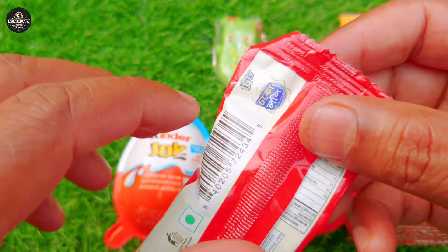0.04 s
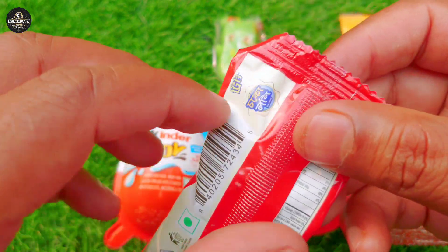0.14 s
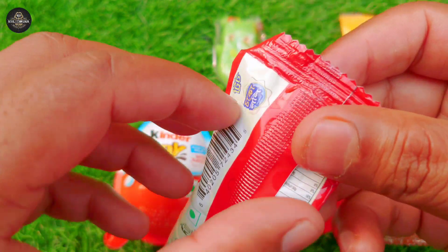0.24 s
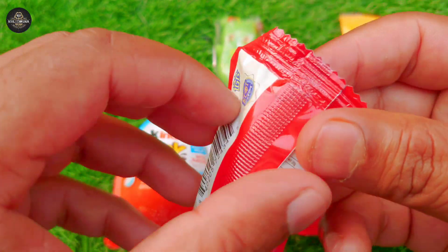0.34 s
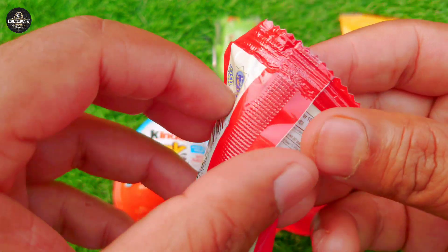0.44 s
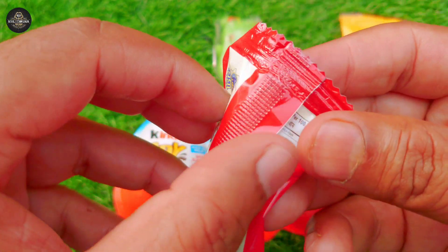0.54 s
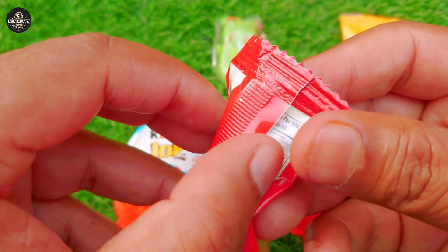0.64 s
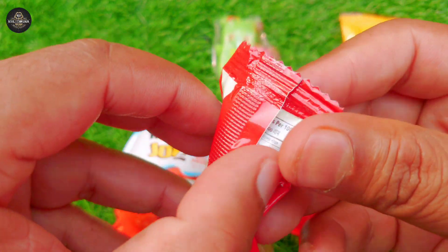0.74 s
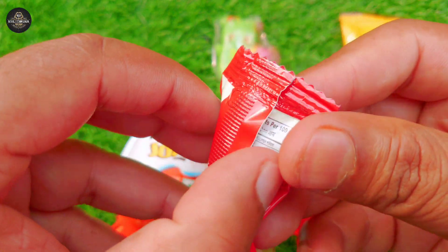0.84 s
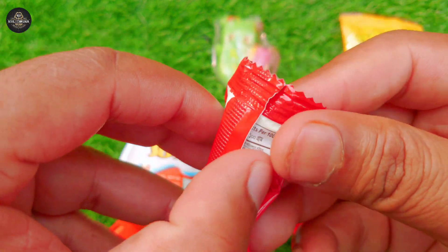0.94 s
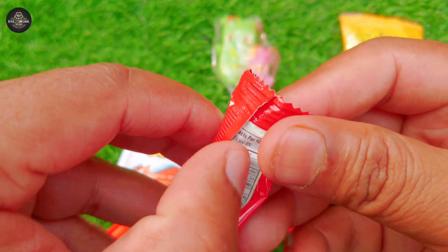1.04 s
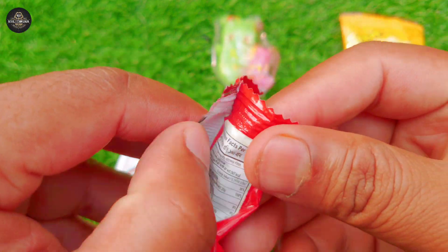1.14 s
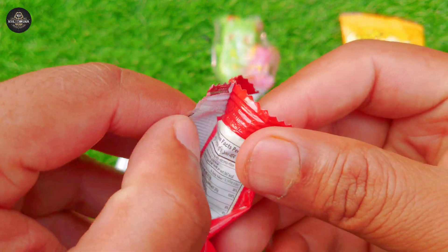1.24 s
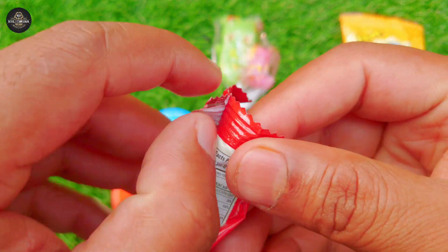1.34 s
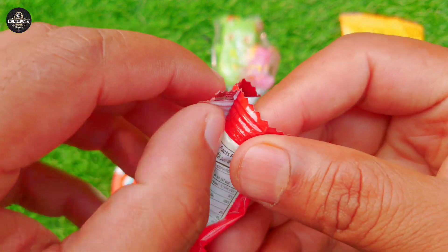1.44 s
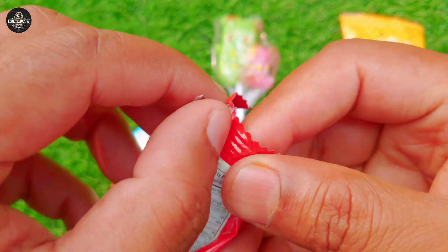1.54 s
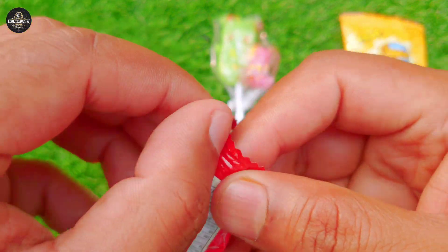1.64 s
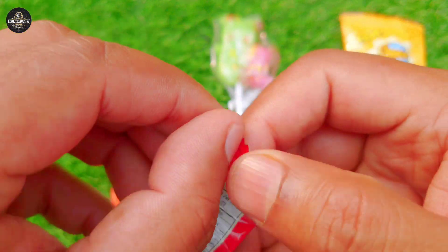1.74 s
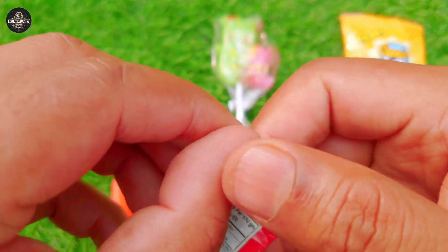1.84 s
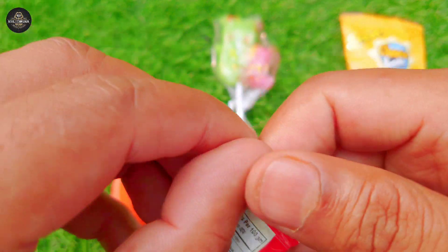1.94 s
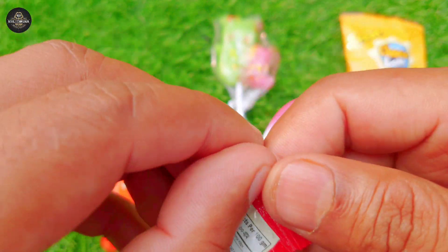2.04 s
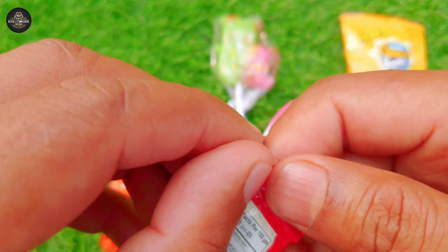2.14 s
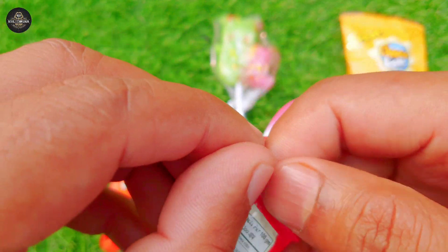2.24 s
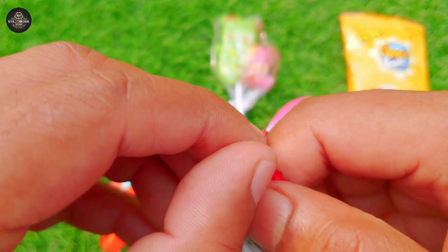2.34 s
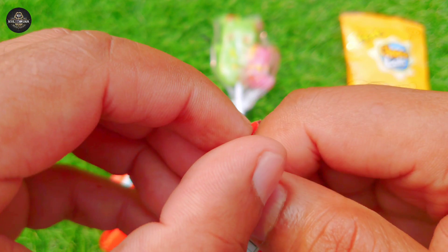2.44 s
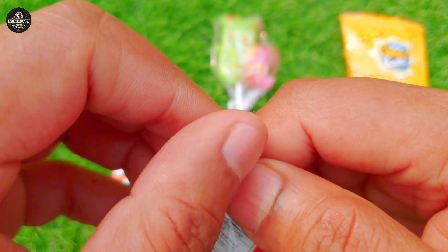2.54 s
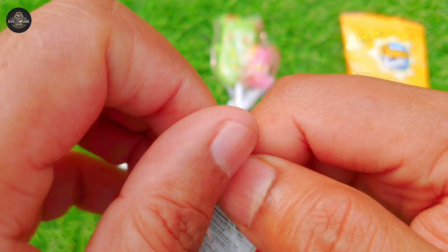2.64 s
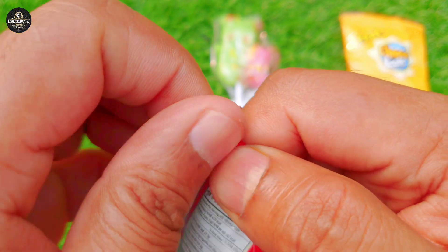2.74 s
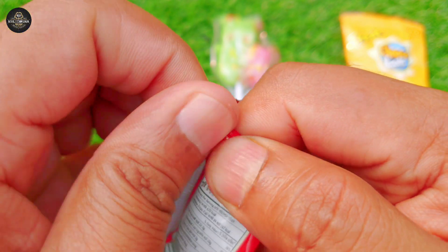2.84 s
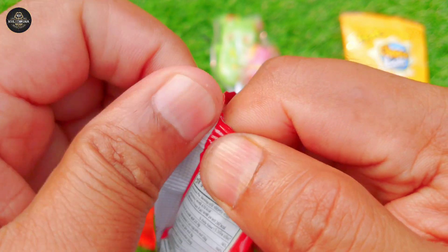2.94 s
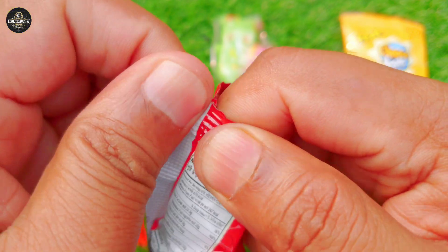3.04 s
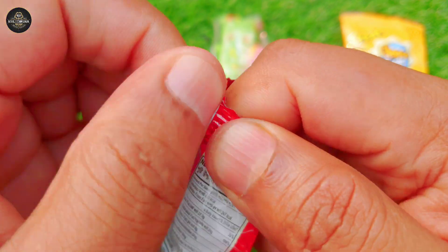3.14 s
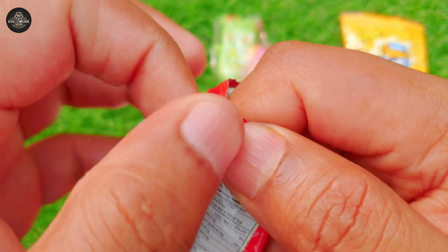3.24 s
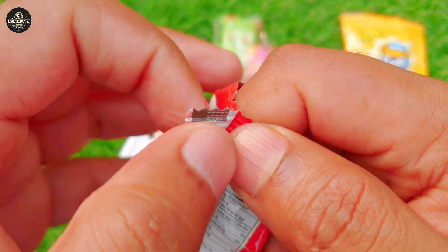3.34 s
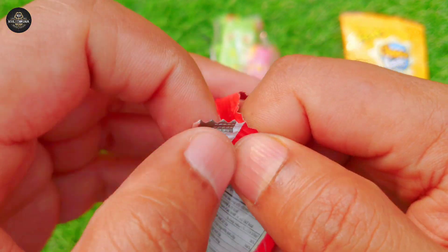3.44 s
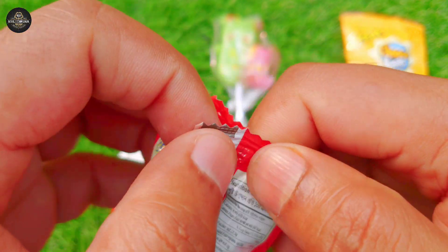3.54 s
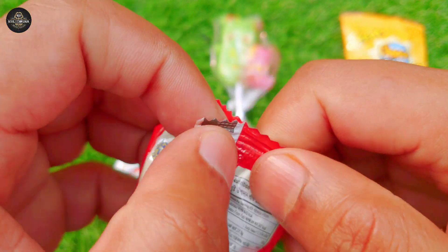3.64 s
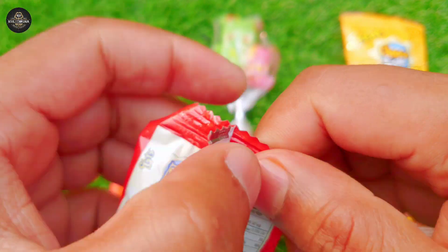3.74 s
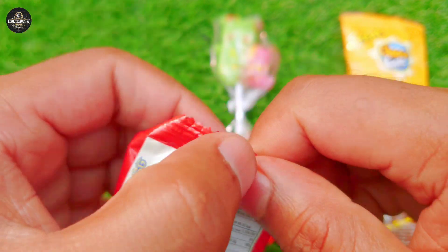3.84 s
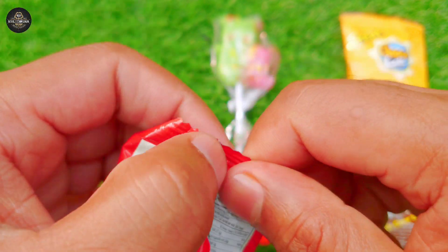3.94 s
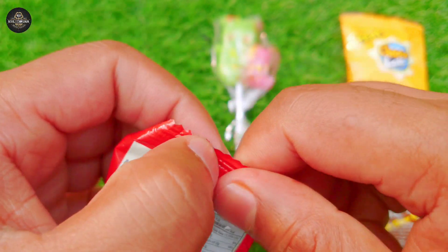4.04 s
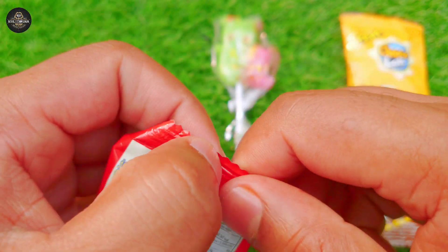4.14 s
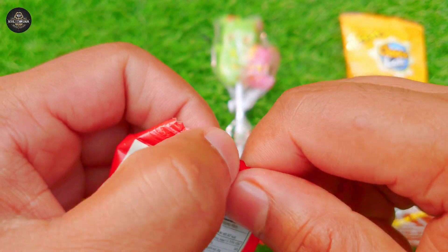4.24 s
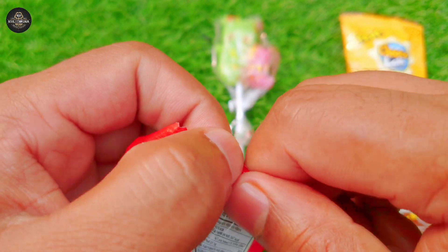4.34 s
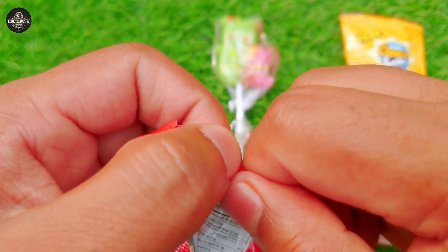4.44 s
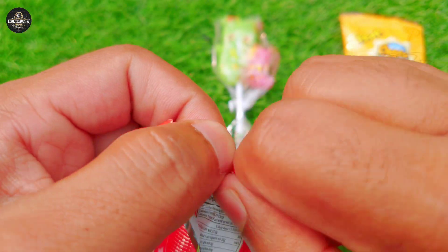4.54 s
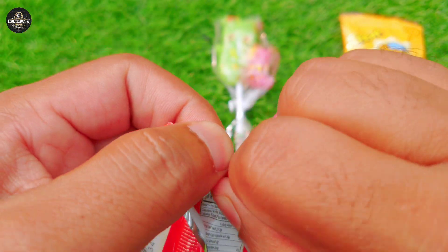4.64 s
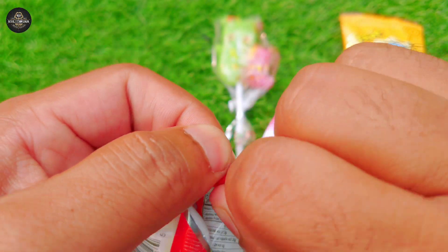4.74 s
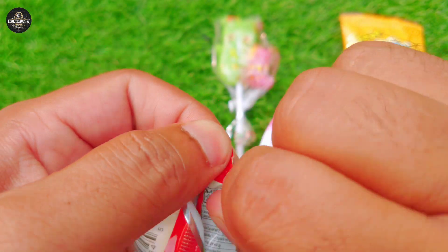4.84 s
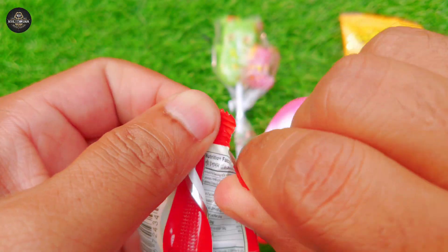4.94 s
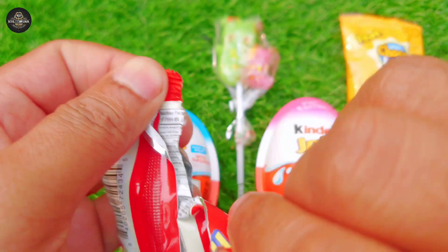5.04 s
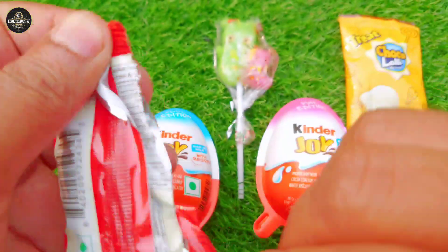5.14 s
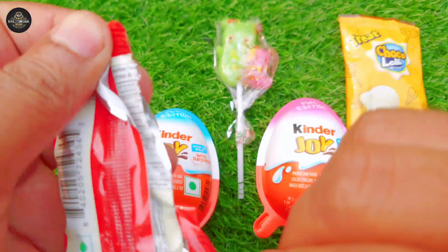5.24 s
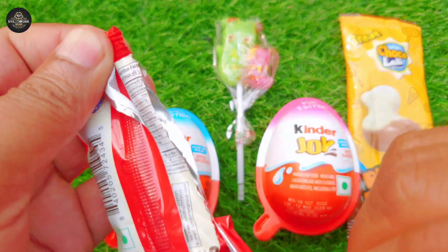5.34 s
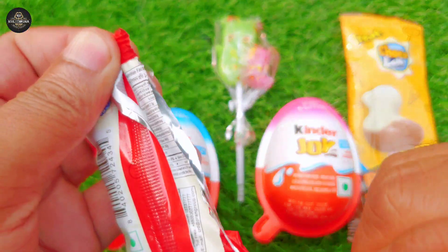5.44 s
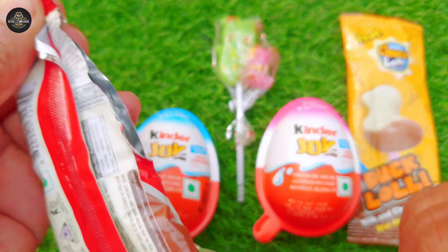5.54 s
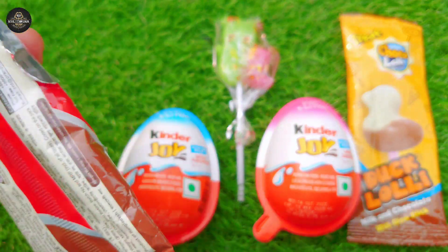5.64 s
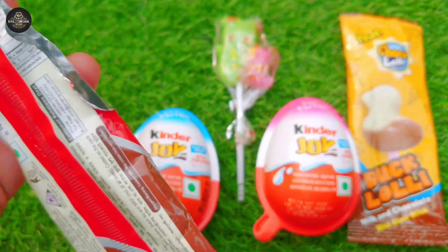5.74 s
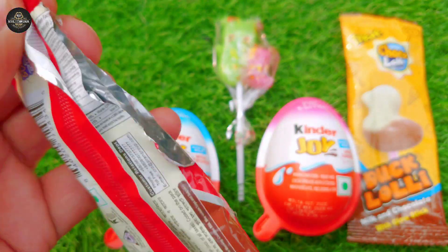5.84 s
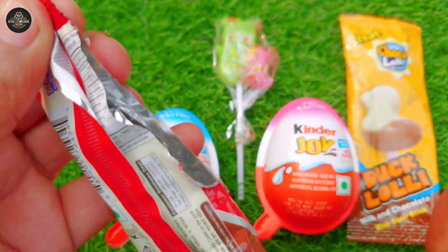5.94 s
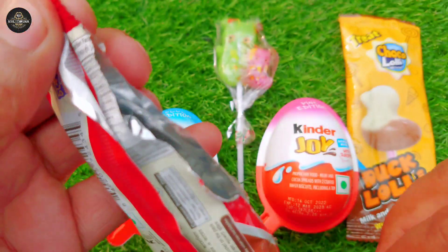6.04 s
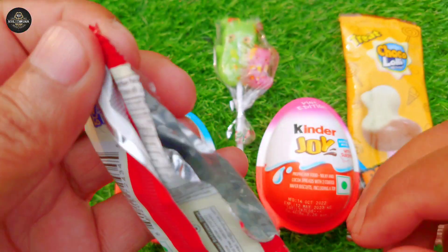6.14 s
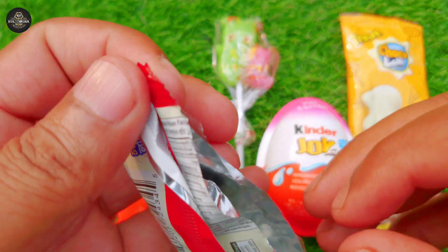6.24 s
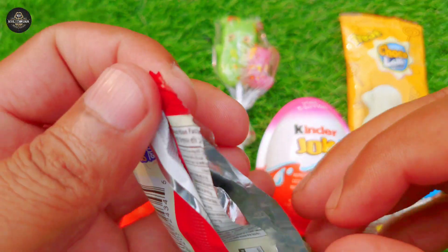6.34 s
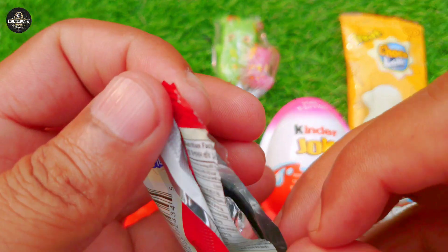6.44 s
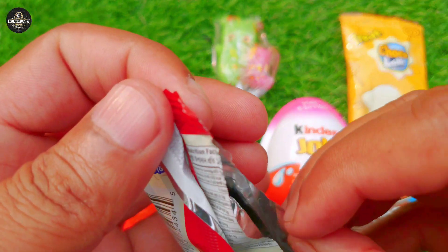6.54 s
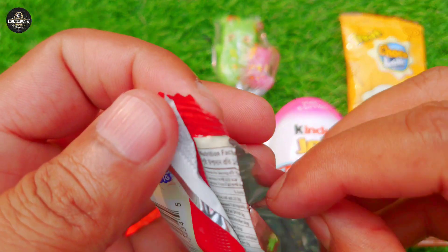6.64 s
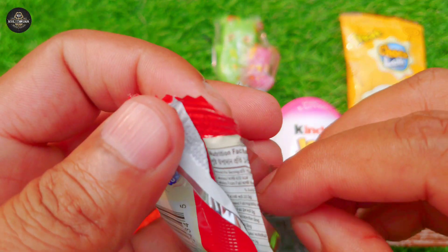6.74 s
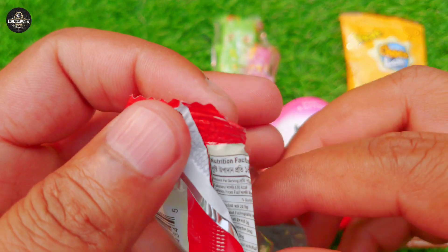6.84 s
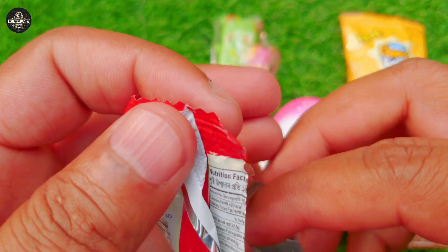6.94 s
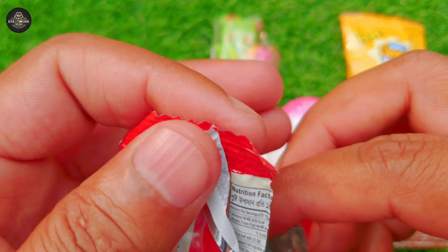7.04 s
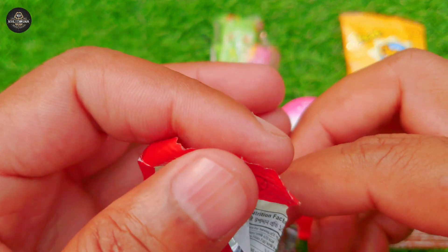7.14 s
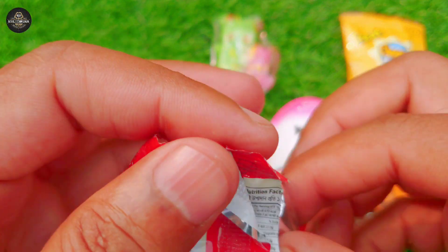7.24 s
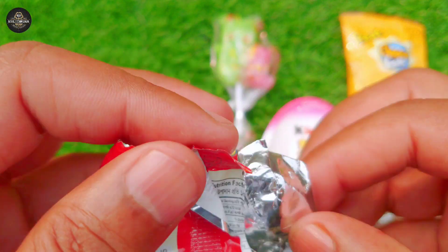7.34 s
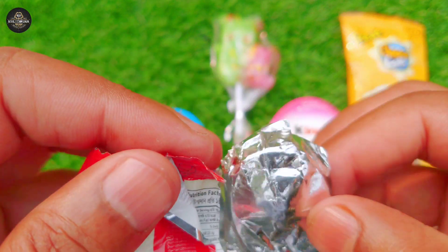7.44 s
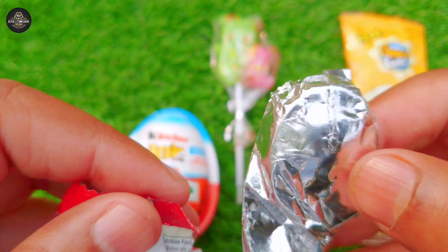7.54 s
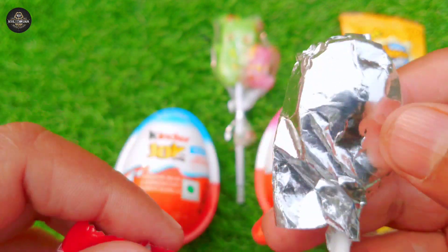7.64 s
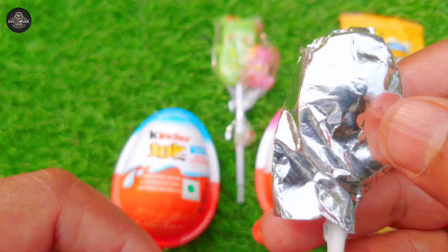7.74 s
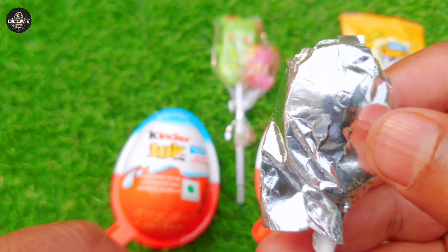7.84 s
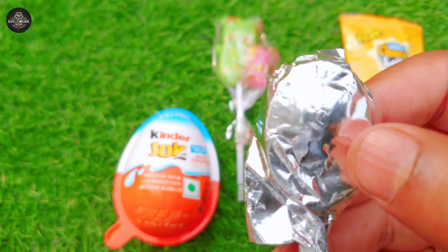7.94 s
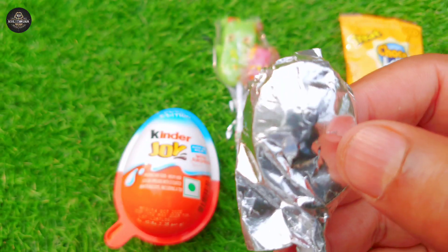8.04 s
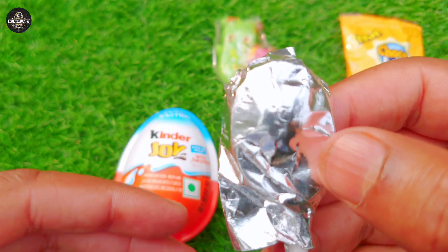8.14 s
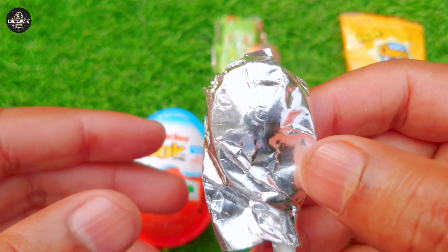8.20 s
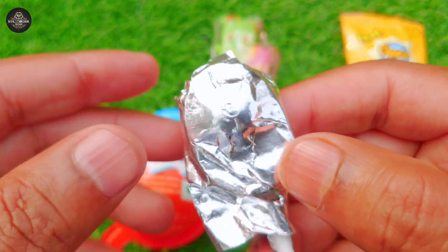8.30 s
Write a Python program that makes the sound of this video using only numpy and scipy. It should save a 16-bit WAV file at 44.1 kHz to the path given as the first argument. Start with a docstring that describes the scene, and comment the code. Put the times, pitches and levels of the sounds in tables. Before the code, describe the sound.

Fingers crinkle and peel a stiff film packet in sharp snaps and fine crackle, while a faint hum and distant hoarse bird sit behind.

```python
"""Fingers pinch, tear and peel open a plastic sweet wrapper close to the microphone, then draw out a foil-wrapped lolly.
Noise pushes ring film resonances: creases buckle in single snaps over a bed of fine crackle.
Hands knock softly as damped sines, film slides as swelling top-end hiss, and the seam squeaks in fast runs of slips.
Behind lie a sinking motor hum, drone, air, a thin high tone, a far bird of throat-filtered pulses and a sagging tone.
The recorder cuts a row of notches into the sound."""
import sys
import numpy as np
from scipy import signal
from scipy.fft import rfft, irfft
from scipy.io import wavfile

SR = 44100
rng = np.random.default_rng(int(sys.argv[2]) if len(sys.argv) > 2 else 0)


def wrap_up_sound(samples):
    """Save the sound to the file named by the first command line argument, as 16-bit audio."""
    columns = np.atleast_2d(samples).T
    # keep every value between -1 and 1, then stretch to whole-number steps
    tamed = np.clip(columns, -1, 1)
    steps = np.round(tamed * 32767).astype(np.int16)
    wavfile.write(sys.argv[1], SR, steps)


N = 369116
TIME = np.arange(N) / SR

# loud creases buckling: start_s, then levels before the mix lift of the held packet's thump_db,
# the film panel's crack_db and the crease's tick_db
LOUD_SNAPS = [(0.037,-50,-47.5,-50),(0.207,-43.5,-41,-47),(0.3531,-48,-43,-47),(0.3613,-41,-34,-40),(0.3835,-75,-44,-54),(0.407,-53.5,-49,-58),(0.4487,-56,-74,-84),
              (0.5191,-47,-48,-49.5),(0.5453,-44.5,-44,-48),(0.5896,-45,-51,-51),(0.6111,-41,-35,-36),(0.625,-52,-49,-47.5),(0.7211,-77,-57.5,-79),(0.7683,-39,-46,-48.5),(0.8112,-55,-47.5,-39),(0.8166,-46,-32.5,-36),(0.8665,-63,-52.5,-42.5),
              (1.0102,-55,-52.5,-55),(1.0701,-47,-40.5,-43),(1.1294,-41,-43,-57),(1.213,-54,-45,-47),(1.2184,-55,-42,-43),(1.297,-46.5,-43,-39.5),(1.3204,-71,-48,-55),(1.3411,-42.5,-36.5,-39.5),(1.395,-44.5,-52,-40.5),(1.3993,-52,-41,-40.5),(1.4163,-68,-46,-40.5),
              (1.577,-56,-44,-36),(1.5895,-53,-42,-38.5),(1.742,-46,-44.5,-45.5),(1.787,-48,-40,-39),(1.8115,-43,-35.5,-36.5),(1.9742,-41.5,-39,-44),(1.997,-65,-53,-56),(2.101,-54,-42,-47),(2.2415,-65,-54.5,-65),(2.3571,-53.5,-43,-48),
              (2.5101,-52.5,-43,-44),(2.525,-49,-49,-44),(2.5484,-48.5,-44.5,-41.5),(2.5899,-71,-51.5,-38.5),(2.6284,-57,-47.5,-52),(2.7105,-49,-45.5,-51),(2.7446,-49,-57.5,-68),(2.8725,-66,-53.5,-46.5),(2.9137,-47.5,-40,-47),(2.9381,-67,-40.5,-46),
              (3.086,-59,-46.5,-40),(3.212,-50,-44.5,-46),(3.277,-55,-48,-41),(3.3416,-49.5,-53,-57.5),(3.409,-41.5,-35,-45),(3.491,-53.5,-55.5,-87),(3.6174,-44,-49.5,-56),(3.6787,-34,-52,-31),(3.6839,-35.5,-29.5,-37),(3.761,-47,-50,-54.5),
              (3.844,-74,-53.5,-45),(3.876,-60,-52,-56),(3.9255,-39.5,-43,-49),(3.9929,-49,-46.5,-39),(4.032,-62,-54,-46),(4.0545,-47,-38.5,-39.5),(4.1302,-50.5,-58.5,-40),(4.1521,-55,-45.5,-47),(4.2123,-39.5,-34.5,-33.5),(4.312,-54.5,-56.5,-48),
              (4.5247,-46,-54.5,-58),(4.5886,-70,-53.5,-52),(4.6129,-46,-48,-39.5),(4.6618,-45,-42,-46),(4.6673,-46,-42.5,-35.5),(4.7043,-51,-51,-64.5),(4.8413,-68,-66.5,-58.5),(4.9299,-47,-40,-39.5),(5.0184,-48,-46.5,-56),(5.0507,-48,-48,-40.5),(5.203,-71,-59,-43),
              (5.22,-50,-46,-51),(5.2445,-40.5,-40,-33),(5.2505,-35,-33,-32),(5.2874,-37,-39,-38),(5.3037,-63,-33,-57.5),(5.3303,-42,-51,-33),(5.449,-73,-46,-35.5),(5.4783,-67,-76,-53),(5.5472,-34.5,-34.5,-44),(5.5604,-74,-69,-39),(5.617,-52,-47.5,-45),
              (5.6884,-37.5,-60,-51),(5.7205,-68,-55,-31.5),(5.7335,-34,-63,-28),(5.7463,-34.5,-38,-53),(5.7554,-60,-45,-38),(5.7839,-46.5,-48.5,-83),(6.0668,-66,-54.5,-47.5),(6.2248,-60,-62.5,-79),
              (6.7767,-48,-63,-62),(6.8952,-39,-47,-65),(6.975,-43,-47.5,-58),(7.0306,-47,-44,-44),(7.155,-54.5,-71,-83),(7.271,-48,-67,-69),(7.38,-43.5,-46,-73),(7.3981,-38,-33,-34.5),(7.414,-38.5,-47,-40),(7.4338,-49,-59,-65),(7.441,-48,-62,-37.5),
              (7.5913,-77,-51,-58),(7.6049,-49,-63.5,-76),(7.647,-49,-52.5,-66),(7.7067,-58,-45,-45),(7.756,-42,-50,-62),(7.7678,-55.5,-44.5,-53),(8.0472,-54,-54.5,-65)]


def from_db(db):
    """Decibels to gain."""
    return 10 ** (np.asarray(db) / 20)


def rms_one(x):
    """Scale to rms 1."""
    return x / np.sqrt(np.mean(x ** 2) + 1e-20)


def in_time(rows):
    """Each column of a curve table at every sample."""
    s, *columns = np.transpose(rows)
    return [np.interp(TIME, s, c) for c in columns]


def add(out, s, sound):
    """Mix a sound in at time s."""
    at = max(round(s * SR), 0)
    out[at:at + len(sound)] += sound[:max(N - at, 0)]


def cut(x, hz, kind, order=2):
    """Butterworth low- or high-pass."""
    return signal.sosfilt(signal.butter(order, hz, kind, fs=SR, output="sos"), x)


def resonate(x, hz, width_hz):
    """One resonance with gain 1 on top."""
    k = 1 / (1 + np.tan(np.pi * width_hz / SR))
    feedback = [1, -2 * k * np.cos(2 * np.pi * hz / SR), 2 * k - 1]
    return signal.lfilter([1 - k, 0, k - 1], feedback, x + 1e-18)


def drift(per_s):
    """Smooth random wander of rms 1, heading for per_s new values a second."""
    knots = rng.standard_normal(N // 8)
    return rms_one(np.interp(TIME * per_s, np.arange(len(knots)), knots))


def wrapper(push, thump_hz, crack_hz, bite):
    """A push sounds three ways: the packet thumps, the film panel cracks with an overtone and a bite, the crease ticks."""
    # film held in the fingers is heavily damped, so its resonances are broad
    thump = cut(resonate(push, thump_hz, 2 * thump_hz), 1000, "low")
    panel = resonate(push, crack_hz, .4 * crack_hz)
    overtone = .55 * resonate(push, 1.58 * crack_hz, .25 * crack_hz)
    crack = cut(panel + overtone + bite * resonate(push, 5730, 5600), 3510, "low")
    tick = cut(push, 3800, "high") + .7 * resonate(push, 13800, 3000)
    return thump, crack, tick


def holding_db():
    """A firmer hold raises the thump, crack and tick levels of the film under resting fingers."""
    # firmness of the hold as a base crackle level: start_s, level_db
    hold_curve = [(0,-114),(0.3,-102),(0.6,-79.5),(1.5,-88),(2.3,-82),(2.9,-87),(3.9,-77),(4.42,-89.5),(4.8,-84.5),(5.4,-73),(5.9,-86),(6.7,-92.5),(7.35,-74.5),(7.7,-82),(7.82,-93),(8.37,-95)]
    # offsets from that level: thump_db, crack_db, tick_db
    hold_offsets = (6, 4.5, -2)
    return np.array(hold_offsets)[:, None] + in_time(hold_curve)[0]


def rubbing_db(rise_db_per_s=1298.5, fall_db_per_s=601, uneven_db=2.5):
    """Each stroke rises quickly, holds and dies away; between strokes only the hold is left."""
    # fingers pinch, rub or pull: start_s, length_s, then thump_db, crack_db, tick_db before wander and mix lift
    finger_strokes = [(0,0.03,-57.5,-60,-74),(.207,0.036,-65,-64,-76),(0.36,0.072,-55.5,-61,-79),(0.482,0.15,-57.5,-63.5,-80),(0.773,0.19,-64.5,-68,-84),(1.066,0.042,-62,-52,-77),(1.283,0.052,-53,-48.5,-57.5),(1.395,0.032,-59,-66,-79),(1.475,.13,-58.5,-59,-75),
                      (1.731,.1,-61.5,-58.5,-68),(1.954,0.02,-57,-56,-67),(2.507,0.1,-59.5,-63.5,-71),(2.867,0.071,-70.5,-65,-67),(3.078,0.11,-58,-65.5,-66),(3.354,0.062,-57,-58,-56.5),(3.587,0.058,-47,-55.5,-66.5),(3.666,0.023,-41,-43.5,-54),(3.723,0.11,-60.5,-61,-63),
                      (3.87,0.077,-58.5,-53,-65),(3.979,0.18,-58,-60.5,-64),(4.528,0.12,-62.5,-67,-75),(4.98,0.065,-55.5,-59,-56.5),(5.162,0.046,-58,-62,-47),(5.239,0.11,-43,-44.5,-44),(5.485,.1,-55.5,-52.5,-44.5),(5.534,0.028,-43.5,-47,-40.5),(5.683,0.05,-59.5,-50.5,-41),
                      (5.728,0.042,-43,-45,-40.5),(5.787,0.043,-54,-56.5,-53.5),(6.771,0.11,-59,-65,-70),(7.028,0.62,-58,-65,-72.5),(7.34,.04,-53.5,-57.5,-64),(7.383,0.065,-42.5,-47.5,-54),(7.48,.18,-60,-64,-73.5),(7.687,0.068,-57,-60,-67),(7.908,0.083,-62.5,-65,-68),(8.021,0.02,-60,-63,-74),(8.083,0.054,-69,-69.5,-81.5),(8.261,0.054,-66,-65.5,-72)]
    levels_db = holding_db()
    for s, length_s, *stroke_db in finger_strokes:
        before_db = (s - TIME) * rise_db_per_s
        after_db = (TIME - s - length_s) * fall_db_per_s
        fade_db = np.maximum(np.maximum(before_db, after_db), 0)
        levels_db = np.maximum(levels_db, np.array(stroke_db)[:, None] - fade_db)
    return levels_db + uneven_db * drift(110)


def crackle(quiet_per_s=110, busy_per_s=1300, size_db=4.0, hiss=.12):
    """Countless small creases give way; harder rubbing makes them denser, over a little friction hiss."""
    levels_db = rubbing_db()
    loudest_db = np.maximum(levels_db[0], levels_db[2])  # thump or tick
    effort = np.clip((loudest_db + 65.0) / 26, 0, 1)
    per_s = quiet_per_s + busy_per_s * effort ** 2
    parts = 0
    # broad panels crack low, narrow ones higher; each kind takes half the creases
    for thump_hz, crack_hz in [(150, 1300), (200, 1750)]:
        sizes = from_db(size_db * np.minimum(rng.exponential(1, N), 4))
        gives_way = rng.random(N) < .5 * per_s / SR
        # each grain is a tiny noise burst, not a single step
        bursts = cut(sizes * gives_way + 1e-18, 500, "low", order=1)
        grains = rms_one(bursts * rng.standard_normal(N) / np.sqrt(per_s))
        friction = hiss * (.1 + effort) * rng.standard_normal(N)
        parts = parts + np.array(wrapper(grains + friction, thump_hz, crack_hz, bite=0.37))
    lifts = from_db([2.0, 2.0, 0.5])  # thump, crack, tick
    return sum(lift * from_db(db) * rms_one(p) for lift, db, p in zip(lifts, levels_db, parts))


def room(air_db=-61.0, drone_db=-63):
    """A motor hum that slowly sinks, a wavering lower drone of narrow noise, and still air."""
    # motor: start_s, pitch_hz, level_db (rms, before a small wander)
    motor_curve = [(0, 90, -54), (3.1, 87.35, -52.5), (4.4, 86.5, -59), (8.37, 84.45, -62)]
    # spectrum of the still air: frequency_hz, relative_density_db (per Hz)
    air_spectrum = [(20, -5), (57, -3.5), (72, 0.5), (120, -9.5), (200, -16.5), (400, -26.5), (800, -28),
                    (1500, -34), (2500, -44.5), (5000, -50), (10000, -43.5), (15000, -54.5)]
    hz, level_db = in_time(motor_curve)
    hum_gain = from_db(level_db + 1.3 * drift(12)) * np.sqrt(2)
    hum = hum_gain * np.sin(2 * np.pi * np.cumsum(hz) / SR)
    drone = from_db(drone_db) * rms_one(resonate(resonate(rng.standard_normal(N), 57, 5.4), 57, 5.4))
    points = np.array(air_spectrum)
    bins_hz = np.maximum(np.arange(N // 2 + 1) * SR / N, 1)
    colour = from_db(np.interp(np.log(bins_hz), np.log(points[:, 0]), points[:, 1]))
    air = rms_one(irfft(rfft(rng.standard_normal(N)) * colour, N))
    return hum + drone + from_db(air_db) * air


def high_tone(hz=12000, width_hz=30, tone_db=-94):
    """A very faint, thin, steady high tone made of noise through one narrow resonance."""
    return from_db(tone_db) * rms_one(resonate(rng.standard_normal(N), hz, width_hz))


def lesser_snaps(neighbours=1, strays_per_s=12, level_spread_db=6.5):
    """Small creases at random, scattered closely around the loud ones or alone in the hold; rows as in LOUD_SNAPS."""
    near_spread_s, near_loss_db = 0.019, 13.5
    stray_above_db, ceiling_db = 13.5, -49  # above the hold; ceiling before the mix lift
    # two candidates per loud crease, of which on average `neighbours` sound
    loud = np.repeat(LOUD_SNAPS, 2, axis=0)
    near_s = loud[:, 0] + near_spread_s * rng.normal(.5, 1, len(loud))
    near = np.column_stack([near_s, loud[:, 1:] - near_loss_db])
    at = rng.integers(0, N, size=400)
    strays = np.column_stack([at / SR, holding_db()[:, at].T + stray_above_db])
    rows = np.vstack([near, strays])
    rows[:, 1:] += level_spread_db * rng.standard_normal(rows[:, 1:].shape)
    rows[:, 1:] = np.minimum(rows[:, 1:], ceiling_db)
    chance = np.repeat([neighbours / 2, strays_per_s * N / SR / len(at)], [len(loud), len(at)])
    return rows[rng.random(len(rows)) < chance]


def snaps(slip_s=0.00047, after_db=-25, lead_noise_db=-26, size_spread=0.15):
    """Creases flip in about half a millisecond; faint noise swells before and fades after; panel size sets crack pitch."""
    lead_s, lead_noise_s, after_s = .004, .0014, .004
    out, t = np.zeros(N), np.arange(1200) / SR - lead_s
    lifts = from_db([3.0, 3.5, 3.0])  # thump, crack, tick
    lead_noise = from_db(lead_noise_db) * np.exp(-abs(t) / lead_noise_s)
    after = from_db(after_db) * np.exp(-abs(t) / after_s)
    faint_noise = np.where(t < 0, lead_noise, after)
    level_scale = np.sqrt(.005 * SR / len(t))  # levels are rms over 5 ms
    for s, *levels_db in [*LOUD_SNAPS, *lesser_snaps()]:
        speed, grip, panel = np.clip(rng.standard_normal(3), -2, 2)
        flip = np.maximum(t, 0) / (slip_s * np.exp(0.83 * speed))
        push = rng.standard_normal(len(t)) * (flip * np.exp(1 - flip) + faint_noise)
        parts = wrapper(push, 450 * np.exp(.5 * grip), 1570 * np.exp(size_spread * panel), bite=0.67)
        snap = sum(lift * from_db(db) * rms_one(p) for lift, db, p in zip(lifts, levels_db, parts))
        add(out, s - lead_s, level_scale * snap)
    return out


def bumps(ring_s=0.015):
    """Soft, low knocks of the hands as the wrapper gives: sines that die away at once."""
    # knocks: start_s, pitch_hz, level_db (doubled in amplitude below)
    hand_knocks = [(3.68, 135.5, -32.5), (7.389, 78, -38.5), (7.426, 46.5, -32.5)]
    out, t = np.zeros(N), np.arange(8192) / SR
    for s, hz, level_db in hand_knocks:
        add(out, s, from_db(level_db) * np.sin(2 * np.pi * hz * t) * 2 * np.exp(-t / ring_s))
    return out


def bird(pitch_hz=205, every_s=0.198, rasp=0.4, length_s=0.095):
    """An even run of short hoarse calls: rising pulses and noise through a throat, blurred by distance."""
    # loudness of the run, growing and then easing: start_s, level_db (before each call's swell)
    call_levels = [(4.33, -71.5), (5.702, -67), (6.101, -66), (6.8, -65.5), (7.3, -57.5), (8.299, -63)]
    # throat resonances, each passed twice: pitch_hz, width_hz (of one pass), level_db
    throat_tones = [(740.5, 51, -3), (1213, 170, -8.5), (1430, 510, -14.5), (2420, 130, -22.5)]
    out, t = np.zeros(N), np.arange(8192) / SR
    along = np.minimum(t / length_s, 1)
    swell = np.sin(np.pi * along ** .5)
    curve_s, curve_db = np.transpose(call_levels)
    for s in np.arange(curve_s[0], N / SR, every_s):
        level_db = np.interp(s, curve_s, curve_db)
        hz = pitch_hz * (1 + 0.079 * rng.standard_normal()) * (1 + .11 * along)
        pulses = rms_one(np.diff(np.floor(np.cumsum(hz) / SR), prepend=0))
        voice = pulses + rasp * rng.standard_normal(len(t))
        call = sum(from_db(db) * resonate(resonate(voice, f, w), f, w) for f, w, db in throat_tones)
        add(out, s, from_db(level_db) * rms_one(call) * swell)
    echo = np.interp(TIME - .037, TIME, out)
    return out + 0.59 * echo


def thin_hiss(x, level_rows, low_share=.1):
    """Rubbing film radiates mostly at the very top; silent outside its stroke."""
    s, *_, level_db = np.transpose(level_rows)
    stroke = (TIME > s[0]) & (TIME < s[-1])
    thin = rms_one(resonate(x, 14900, 2400) + low_share * x)
    return stroke * from_db(np.interp(TIME, s, level_db)) * thin


def slide(catch_db=6.0):
    """Smooth film slips through the fingers with a swelling, uneven hiss."""
    # film sliding off the fingertips: start_s, level_db
    slide_curve = [(4.95, -84), (5.0, -62), (5.12, -49), (5.2, -36), (5.225, -79)]
    rub = rng.standard_normal(N) * from_db(catch_db * drift(290))
    return thin_hiss(rub, slide_curve, low_share=0.021)


def seam(catch_db=5.0, friction=0.39):
    """The seal parts in fast runs of slips that catch and let go: short, thin, gliding squeaks."""
    # the seam sticking and slipping: start_s, slips_per_s, level_db
    seam_curve = [(5.46, 830, -65), (5.475, 2800, -36), (5.49, 5300, -39), (5.531, 2700, -35),
                  (5.558, 1340, -35), (5.578, 2300, -46), (5.613, 1200, -40), (5.642, 2100, -66),
                  (5.679, 2500, -28), (5.692, 2300, -34), (5.724, 1700, -33), (5.737, 2500, -61)]
    per_s, _ = in_time(seam_curve)
    phase = 2 * np.pi * np.cumsum(per_s * (1 + .045 * drift(500))) / SR
    # eight harmonics, dropping those too high to represent
    slips = rms_one(sum(np.cos(k * phase) * (k * per_s < SR / 2) for k in range(1, 9)))
    squeak = (slips + friction * rng.standard_normal(N)) * from_db(catch_db * drift(500))
    return thin_hiss(squeak, seam_curve, low_share=.06)


def far_tone():
    """A faint, nearly pure tone lifts a little, then sags in the distance."""
    # start_s, pitch_hz (before a slight wander), level_db (rms)
    tone_curve = [(7.45, 745, -80), (7.52, 772, -67), (7.68, 733, -67.5), (7.82, 688, -69),
                  (7.87, 650, -73), (7.9, 625, -103)]
    hz, level_db = in_time(tone_curve)
    sounding = (TIME > tone_curve[0][0]) & (TIME < tone_curve[-1][0])
    phase = 2 * np.pi * np.cumsum(hz * (1 + 0.0089 * drift(60))) / SR
    return sounding * from_db(level_db) * np.sqrt(2) * np.sin(phase)


def scene():
    """The wrapper is close and dry; everything else lies far behind it."""
    close = snaps() + crackle() + bumps() + slide() + seam()
    behind = bird() + far_tone() + room() + high_tone()
    return (close + behind)[None]


def record(dry, notch_spacing_hz=1013, notch_q=5.28, notch_db=-23, cutoff_hz=16812):
    """The microphone colours it; ten evenly spaced notches, wider towards the top, hollow the sound; the top is cut."""
    # broad dips and humps of the microphone: centre_hz, width_hz, level_db
    mic_bands = [(319, 230, -2), (840, 190, 1), (2105, 130, -4), (6300, 1800, 5), (10370, 4800, -1)]
    out = dry
    # adding or removing a share of a resonance lifts or dips that band
    for hz, width_hz, colour_db in mic_bands:
        out = out - (1 - from_db(colour_db)) * resonate(out, hz, width_hz)
    for hz in notch_spacing_hz * np.arange(1, 11):
        out = out - (1 - from_db(notch_db)) * resonate(out, hz, hz / notch_q)
    # 70 dB down from the cutoff upwards
    return signal.sosfilt(signal.cheby2(12, 70, cutoff_hz, fs=SR, output="sos"), out)


dry = scene()
out = record(dry)
wrap_up_sound(out)
```